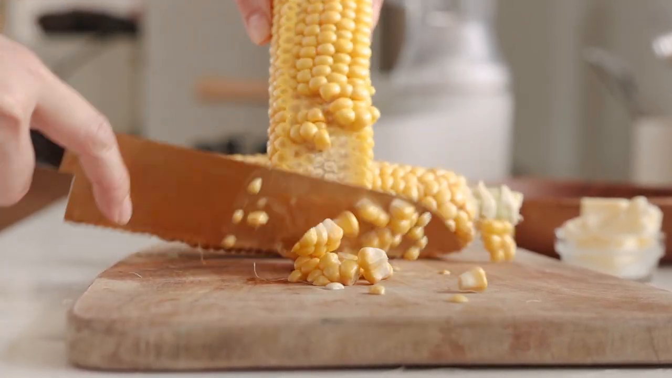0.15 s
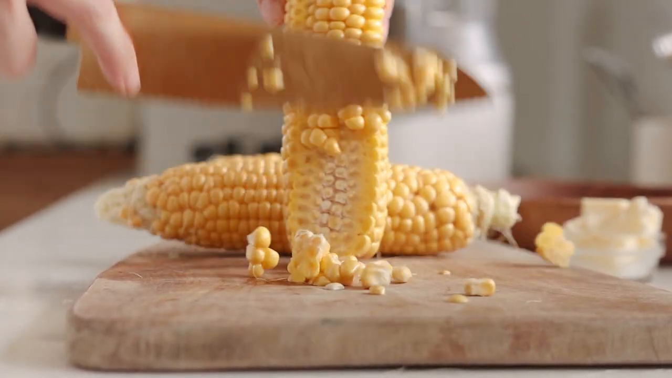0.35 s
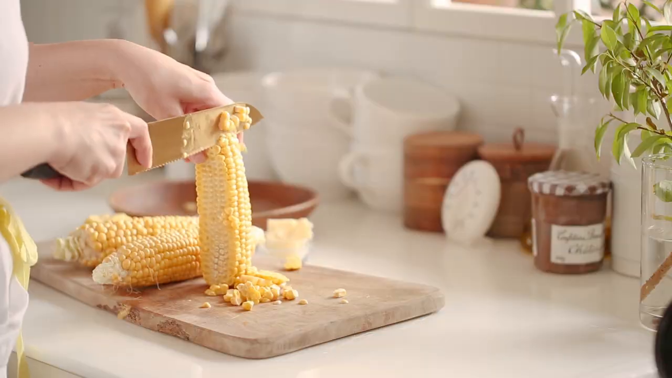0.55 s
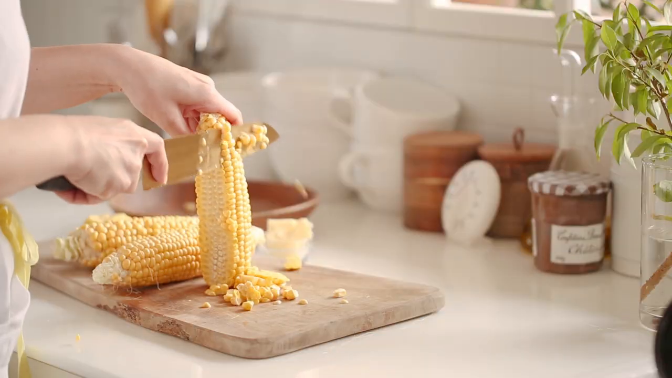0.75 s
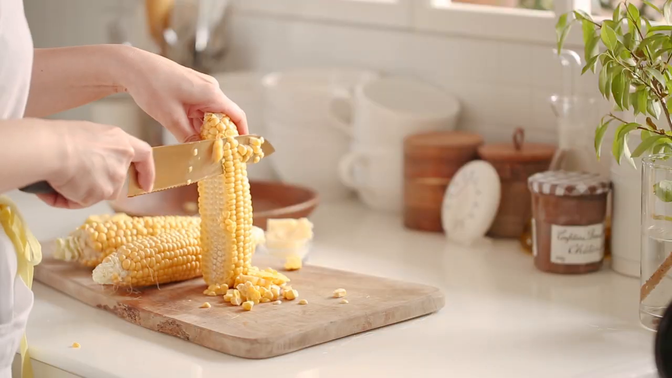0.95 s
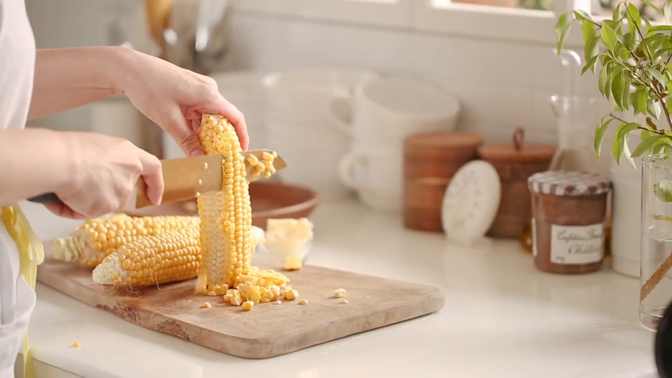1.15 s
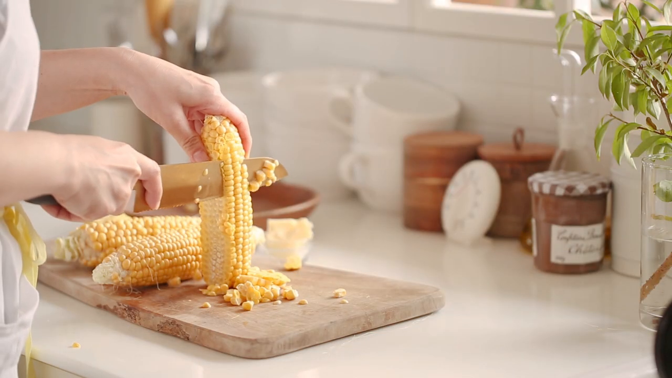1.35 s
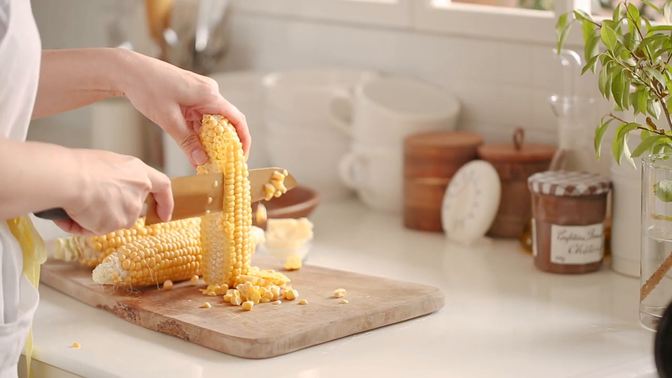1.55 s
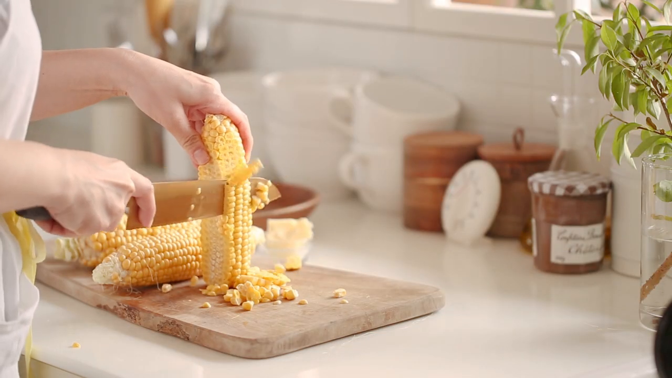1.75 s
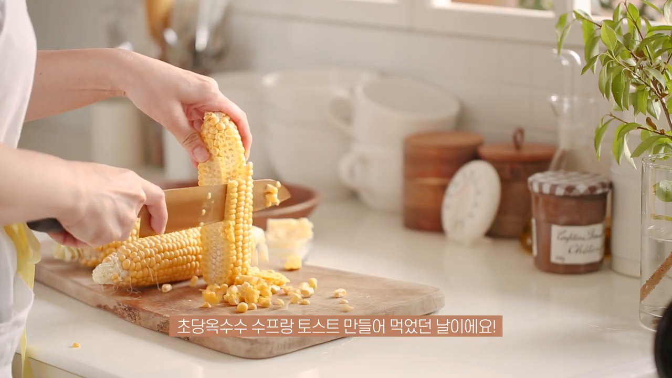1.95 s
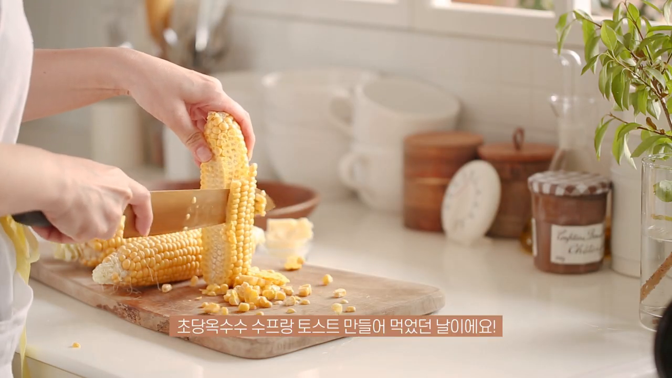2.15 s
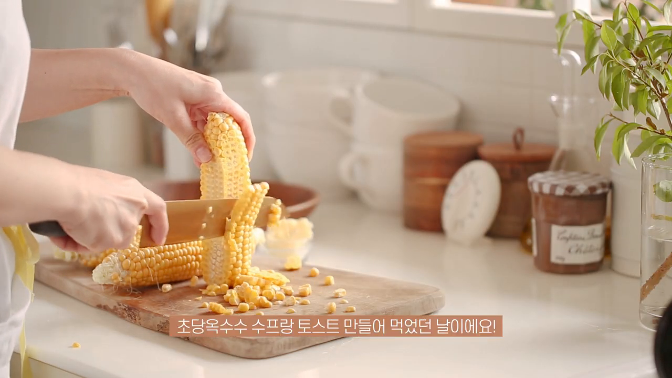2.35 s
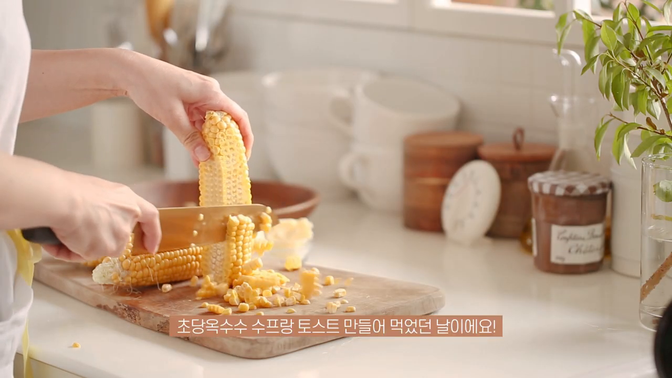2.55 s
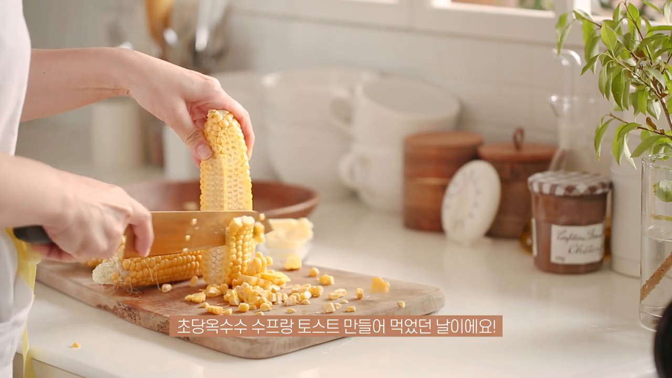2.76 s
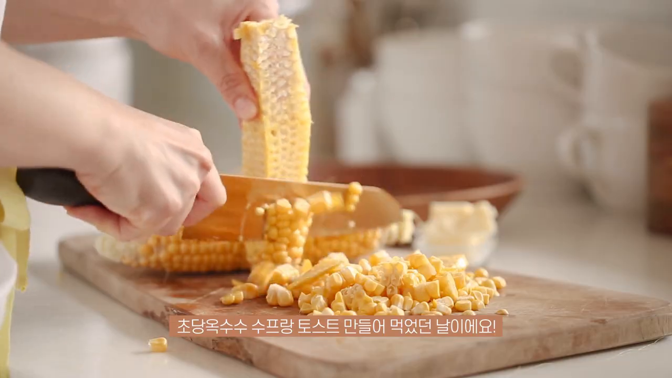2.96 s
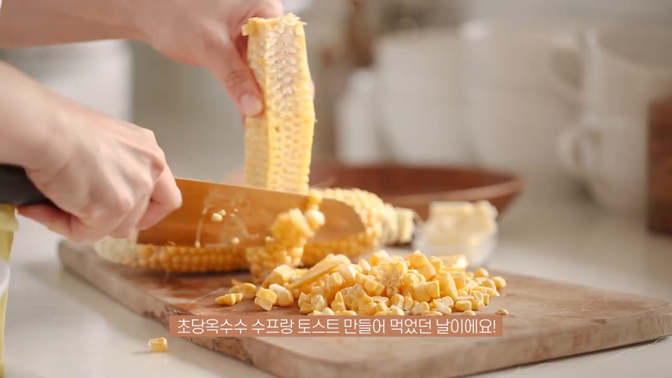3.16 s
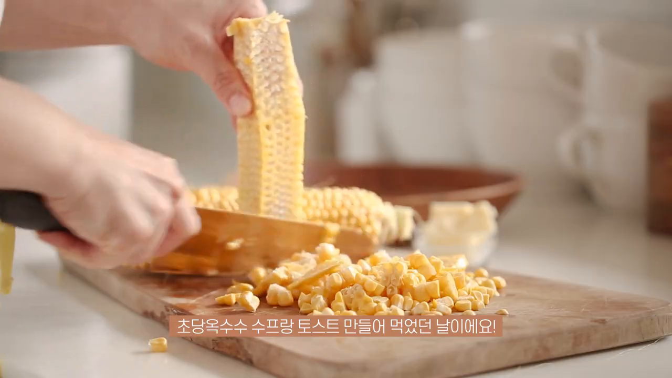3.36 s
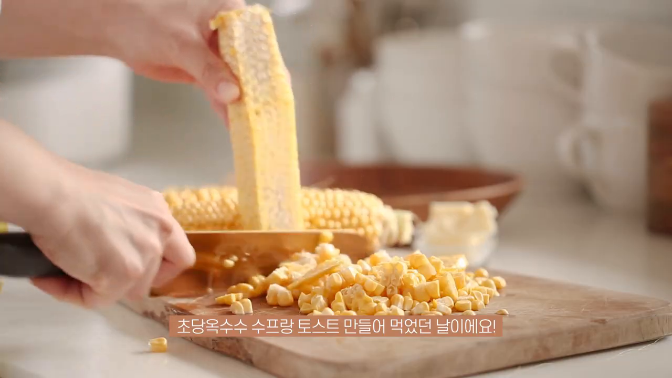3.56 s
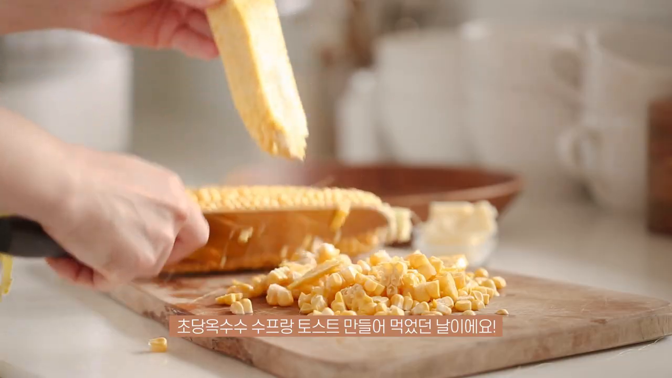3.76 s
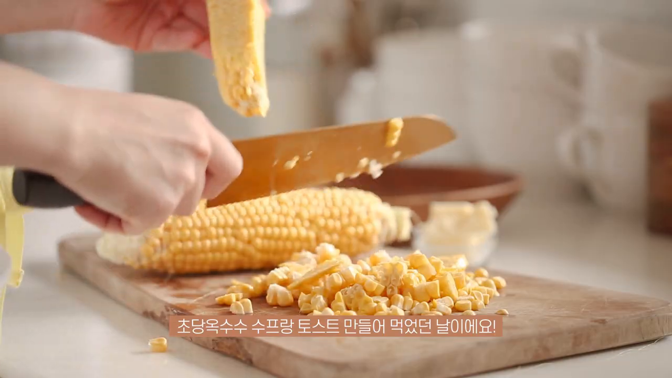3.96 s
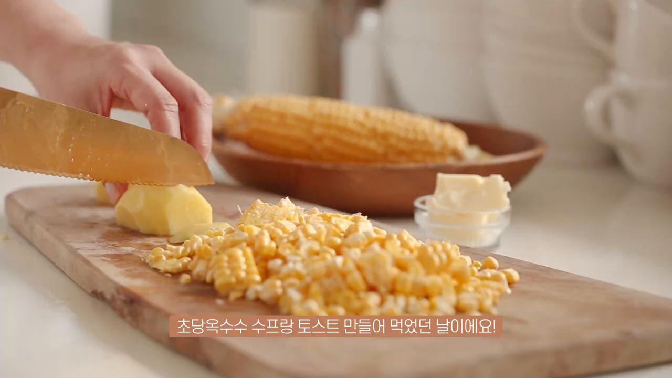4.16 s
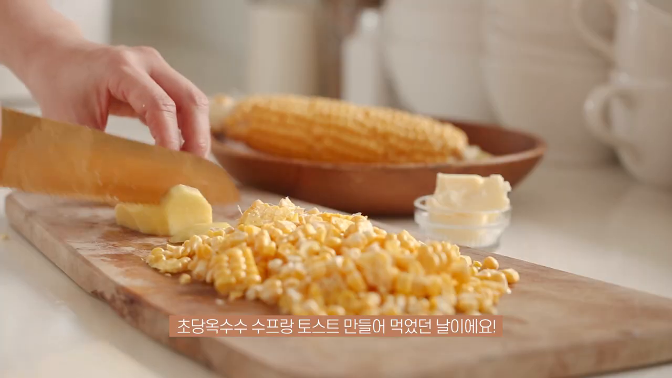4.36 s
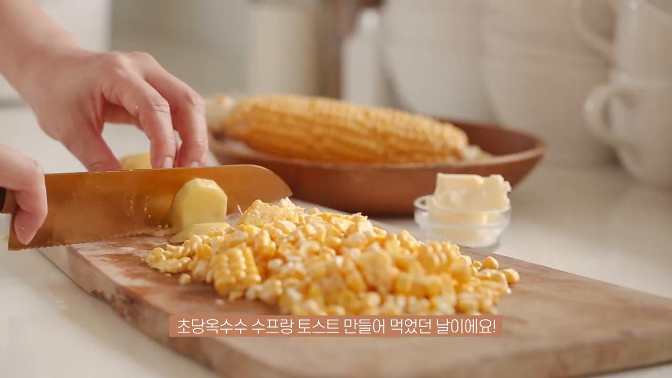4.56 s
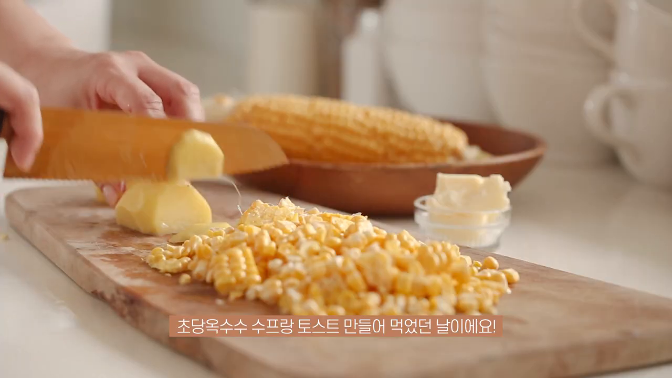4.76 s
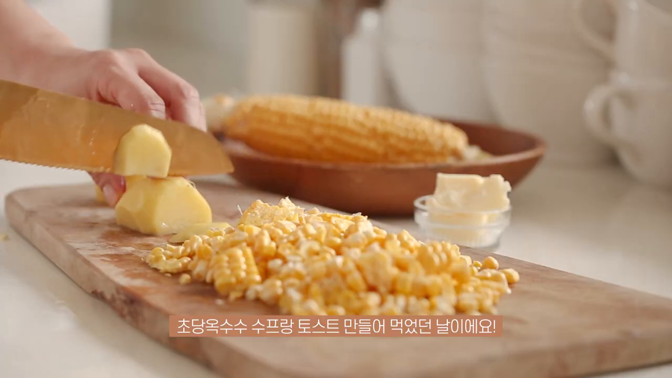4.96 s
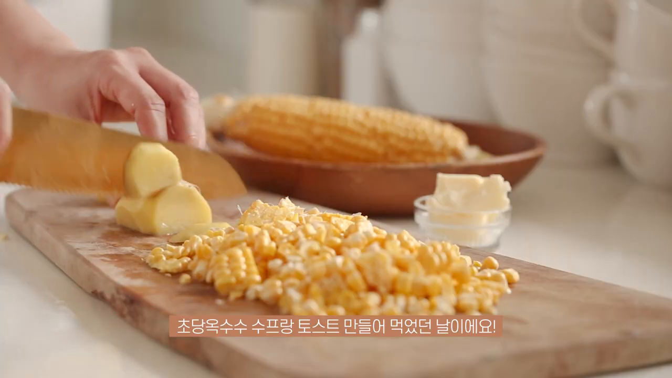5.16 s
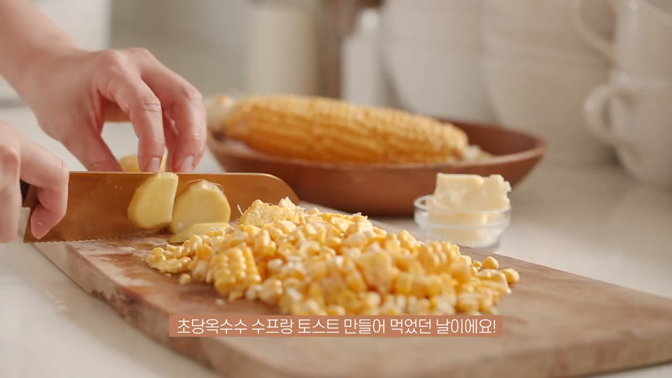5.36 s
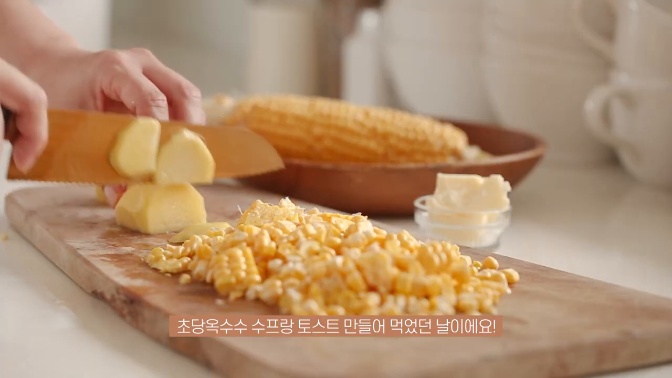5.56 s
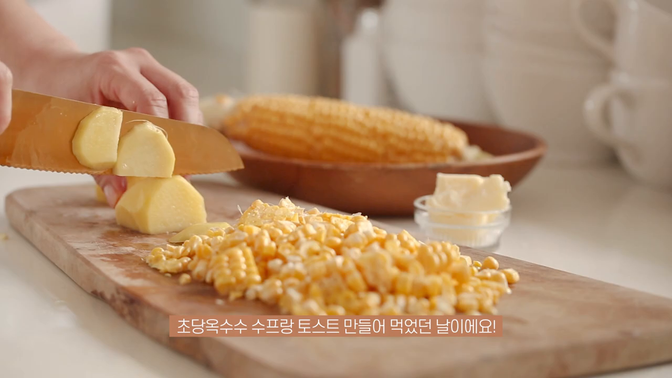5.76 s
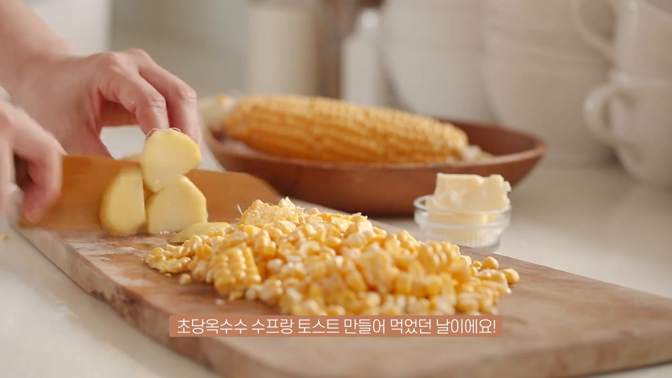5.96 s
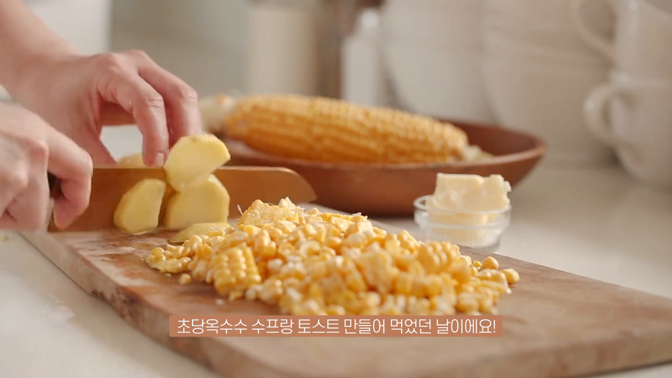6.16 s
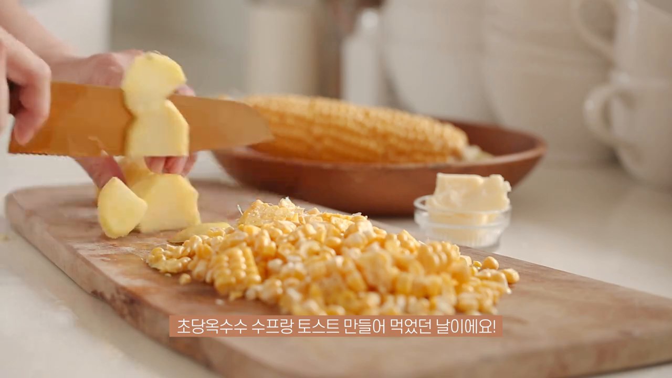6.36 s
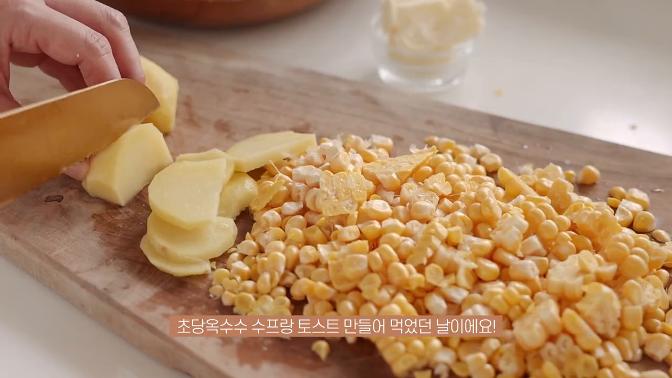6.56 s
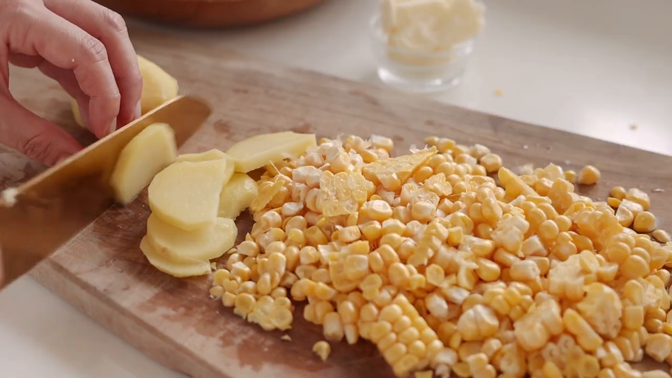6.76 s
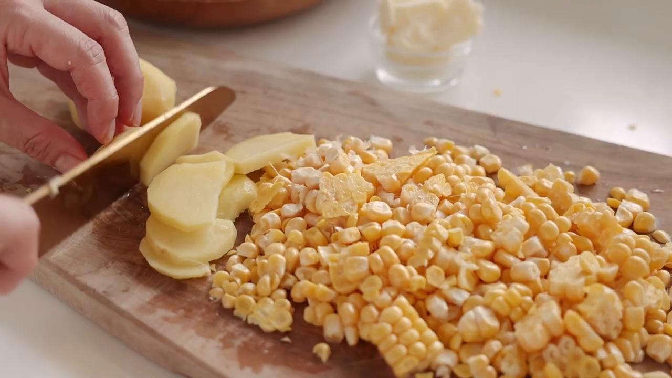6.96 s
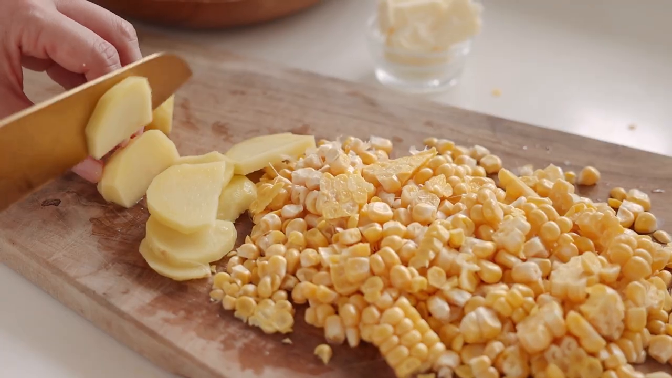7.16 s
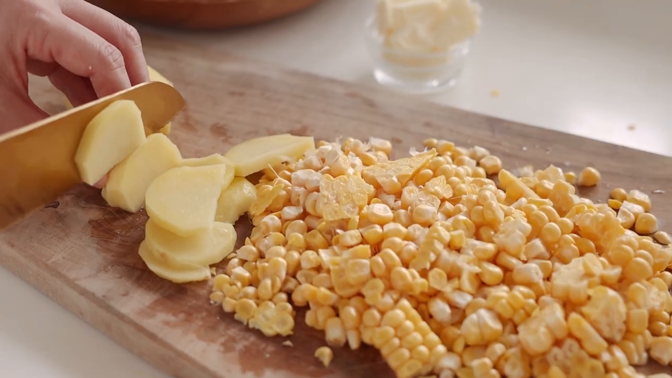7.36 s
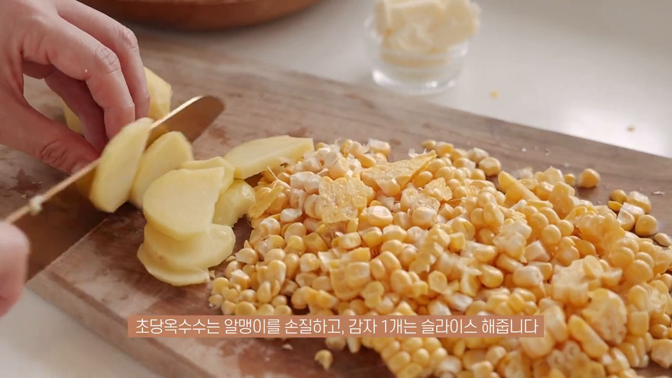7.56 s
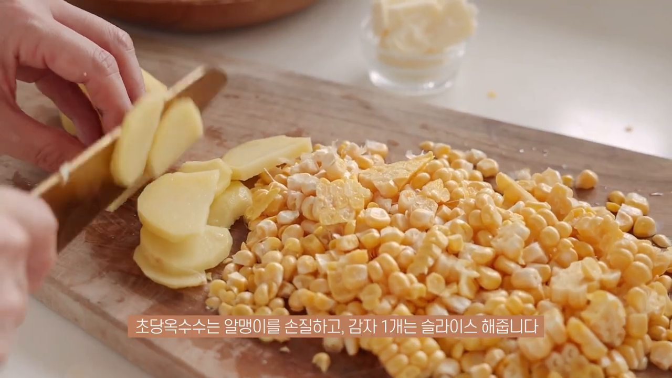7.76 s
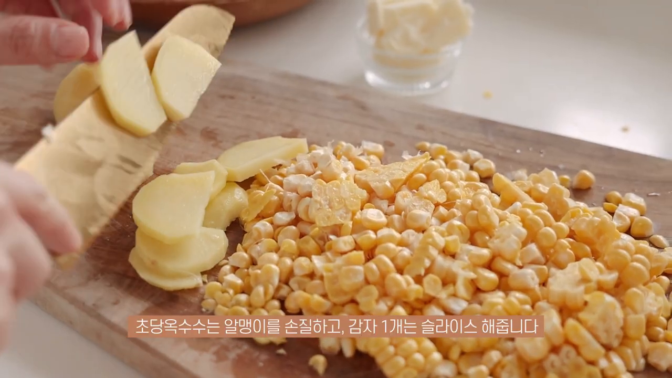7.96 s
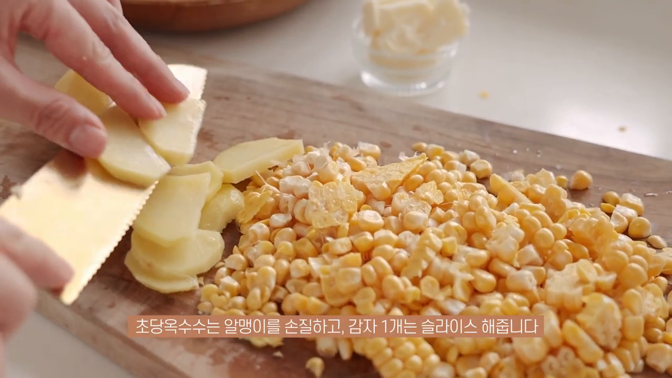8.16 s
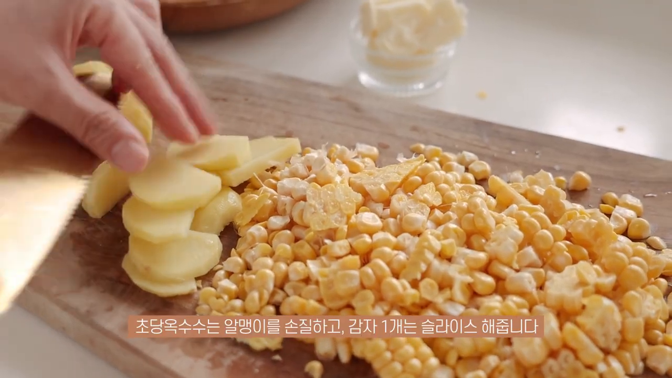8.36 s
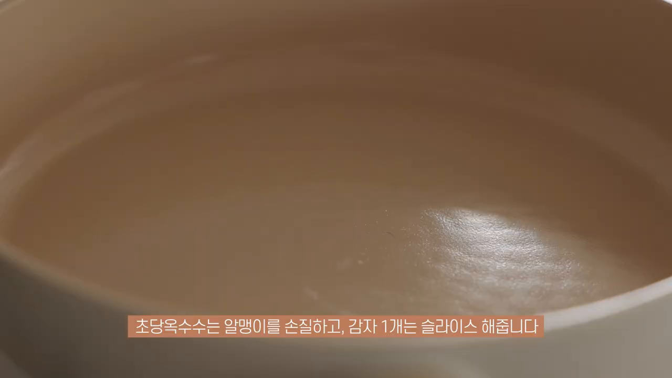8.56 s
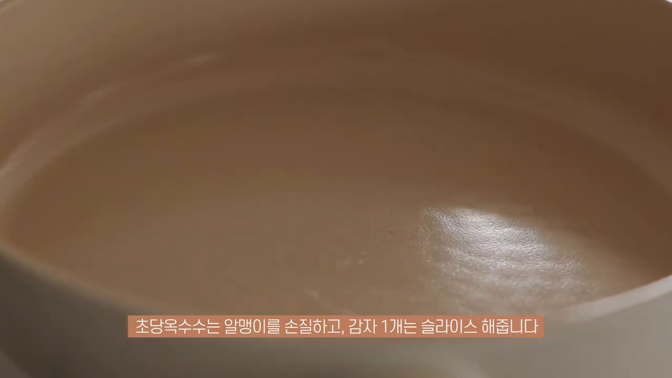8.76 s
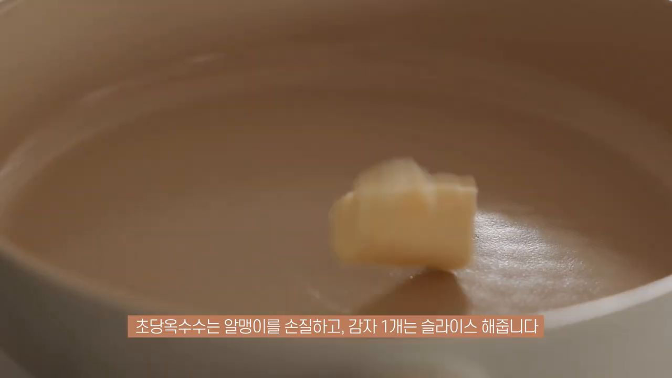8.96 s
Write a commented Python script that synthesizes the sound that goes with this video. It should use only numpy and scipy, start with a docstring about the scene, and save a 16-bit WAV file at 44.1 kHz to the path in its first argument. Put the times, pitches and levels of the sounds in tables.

```python
"""A serrated knife saws the kernels off an upright corn cob, then slices a potato on a wooden board in a kitchen.
Sawing strokes are dense random clicks plus a wavering tooth tone and low noise for the shaken cob.
Bursting skins are ticks of noise with blade modes; loose pieces patter as band-passed board modes.
Each potato slice is a swelling wet hiss of clicks, ending in a knock of the ringing board.
Hard walls ring after it as shaped noise, over quiet room air and a deep rumble."""
import sys
import numpy as np
from scipy import signal
from scipy.fft import rfft, irfft, next_fast_len
from scipy.io import wavfile

SR = 44100
rng = np.random.default_rng(int(sys.argv[2]) if len(sys.argv) > 2 else 0)


def to_wav(sig):
    """Store sig (one row per channel, or 1-D mono) as 16-bit WAV at the path in sys.argv[1].

    Samples outside -1..1 are clipped; the rate is SR.
    """
    pcm = np.clip(np.atleast_2d(sig), -1, 1) * 32767
    pcm = np.round(pcm).astype(np.int16)
    wavfile.write(sys.argv[1], SR, pcm.T)  # frames by channels


N = 396890
TIME = np.arange(N) / SR
CORN_DONE_S = 4.0

# Forward pushes of the saw. Each row: centre in seconds, half length in seconds, crunch in dB, cob judder in dB.
SAW_PUSHES = [(0.018, 0.16, -55.5, -56), (.648, 0.05, -45.5, -50), (0.841, 0.051, -39.5, -39),
              (1.266, .062, -41, -41.5), (1.655, 0.047, -42.5, -40.5), (2.011, 0.042, -44, -49),
              (2.366, 0.049, -41, -44), (2.697, .057, -41.5, -48.5), (3.027, .044, -31, -38),
              (3.358, 0.044, -37.5, -41), (3.653, 0.055, -48, -51.5)]
# Light pulls: drawn back halfway between two pushes while the cycle stays within these limits.
SHORTEST_CYCLE_S, LONGEST_CYCLE_S = 0.22, 0.5
PULL_CYCLE_SHARE = 0.2  # half length over cycle
PULL_CRUNCH_DB, PULL_JUDDER_DB = -52.5, -57  # after a push of mean crunch
PULL_DB_PER_PUSH_DB = 0.28


def sawing():
    """Crunch gain, judder gain and relative blade speed of firm pushes and the light pulls between them."""
    strokes = list(SAW_PUSHES)
    usual_db = np.mean([row[2] for row in SAW_PUSHES])
    for (s, _, db, _), (next_s, *_) in zip(SAW_PUSHES, SAW_PUSHES[1:]):
        cycle_s = next_s - s
        force_db = PULL_DB_PER_PUSH_DB * (db - usual_db)
        if SHORTEST_CYCLE_S < cycle_s < LONGEST_CYCLE_S:
            strokes.append((s + cycle_s / 2, PULL_CYCLE_SHARE * cycle_s,
                            PULL_CRUNCH_DB + force_db, PULL_JUDDER_DB + force_db))
    crunch, judder, speed = np.zeros((3, N))
    for s, half_s, crunch_db, judder_db in strokes:
        stroke = swell(s, half_s)
        crunch += undb(crunch_db) * stroke
        judder += undb(judder_db) * stroke
        speed = np.maximum(speed, stroke)
    return crunch, judder, speed


# Spectrum of the kernel crackle. Each row: frequency in Hz, level in dB.
CORN_SPECTRUM = [(300, -10.5), (600, -8.5), (950, -4.5), (1500, -11), (2200, -8), (3600, -2.5), (5500, -8),
                 (7300, -1.5), (10000, -10), (12800, -5), (16000, -12.5)]
# Spectrum of the cob's shake. Each row: frequency in Hz, level in dB.
JUDDER_SPECTRUM = [(30, -23.5), (60, -2.5), (90, 4.5), (120, -3), (170, 1.5), (230, -5.5), (320, -15),
                   (600, -29), (1500, -59.5)]
# How much the cut shakes the board: strong at first, nearly none at 0.6 s, strong again at the end.
# Each row: time in seconds, level in dB.
BOARD_CONTACT = [(0, 7), (.6, -31), (1.3, -12), (2.8, -9.5), (3.0, -14.5), (3.7, 5.5)]
# The cob's rocking: light at first, stronger mid-way, light again on the last strokes.
# Each row: time in seconds, rocking share in dB.
COB_ROCKING = [(.85, -5), (1.7, 1.5), (3.0, 2.5), (3.4, -6)]


def corn(crunch, judder, speed):
    """Each stroke bursts kernels; the passing teeth catch and shake the cob against the board."""
    tooth_hz = (130 + 26 * speed) * (1 + 0.14 * walk(rate_hz=70))
    tooth = np.sin(2 * np.pi * np.cumsum(tooth_hz) / SR)
    # crunch spurts tooth by tooth
    bite = unit(undb(1.5 * tooth + 2.4 * walk(rate_hz=110)))
    kernels = crackle(CORN_SPECTRUM, rate_hz=7000, scatter_db=2.5, shift_db=5.5, side_db=-9)

    blows = cells(rate_hz=730, scatter_db=1.5)
    wood = unit(signal.fftconvolve(blows, board(detune=0.01, ring=0.81, rebound=0.081))[:N])
    wood = wood * undb(np.interp(TIME, *np.transpose(BOARD_CONTACT)))

    mid, side = (unit(colour(rng.standard_normal(N), JUDDER_SPECTRUM)) for _ in range(2))
    shake = spread(mid, side, side_db=-7.5)
    rocking = undb(np.interp(TIME, *np.transpose(COB_ROCKING)))
    grip = undb(2.5 * walk(rate_hz=30))
    thrum = undb(-3) * unit(tooth * grip) + rocking * shake
    return crunch * (bite * kernels + wood) + judder * thrum


# Loudest skins bursting under the edge. Each row: time in seconds, peak in dB.
SKIN_SNAPS = [(0.594, -32.5), (0.827, -22.5), (1.1134, -34.5), (1.3054, -18.5), (2.0908, -34.5),
              (2.6916, -21), (2.9802, -18.5), (2.9864, -18.5), (3.0026, -17), (3.0235, -16.5),
              (3.0425, -14), (3.1697, -27.5), (3.3169, -23), (7.6136, -16.5)]
# Blade touching the potato between cuts. Each row: time in seconds, peak in dB.
BLADE_TOUCHES = [(4.2371, -51.5), (5.1144, -46.5), (5.5782, -48), (6.5729, -51), (7.3652, -50.5),
                 (8.3924, -47), (8.4868, -35.5)]
# Modes of the steel blade, damped by the food. Each row: frequency in Hz, level in dB, t60 in seconds before the ring factor.
BLADE_MODES = [(2640, 6.5, 0.015), (3940, -10.5, .03), (4300, 0, 0.014), (5720, -4, 0.038),
               (6900, 2, 0.029)]
# Lesser random bursts under the moving blade; peaks relative to the crunch.
BURSTS_PER_S, BURST_DB, BURST_SCATTER_DB = 14, 11.5, 3.5


def snaps(crunch):
    """A taut skin splits: a sharp tick with a little spray, which also tings the blade."""
    out, t = np.zeros((2, N)), np.arange(4096) / SR
    bursts = []
    for s, size in scatter(0, CORN_DONE_S, BURSTS_PER_S):
        crunch_db = 20 * np.log10(crunch[int(s * SR)] + 1e-9)
        bursts.append((s, crunch_db + BURST_DB + BURST_SCATTER_DB * size))
    for s, db in list(SKIN_SNAPS) + list(BLADE_TOUCHES) + bursts:
        decay = np.exp(-t / 0.0014) + undb(-18) * np.exp(-t / 0.005)
        burst = rng.standard_normal((2, len(t))) * decay
        tick = band(burst, [1200, 6000], "bandpass", order=1)
        tick = tick + undb(-5) * band(burst, [6500, 13000], "bandpass")
        ting = unit(ring_modes(BLADE_MODES, detune=0.052, ring=0.42))
        tick = unit(spread(*tick, side_db=-9.5)) + undb(-4) * ting
        add(out, s, undb(db) * tick / np.abs(tick.mean(axis=0)).max())
    return out


# Loudest cut pieces landing on the board. Each row: time in seconds, peak in dB, centre in Hz.
PIECE_DROPS = [(0.021, -20, 1160), (0.04, -18.5, 1190), (0.071, -27.5, 1360), (0.1, -29.5, 1270),
               (0.322, -37.5, 1190), (0.371, -31, 1650), (1.292, -18.5, 1124), (1.433, -24.5, 1590),
               (1.442, -29.5, 990), (1.755, -16.5, 1258), (1.974, -29.5, 1330), (2.113, -20.5, 929),
               (2.259, -31.5, 1110), (2.618, -27, 1630), (3.254, -32, 1560)]
# Showers of crumbs. Each row: start in seconds, end in seconds, mean peak in dB.
CRUMB_SHOWERS = [(0.022, .1, -33), (0.142, .52, -42), (1.418, 1.581, -35), (1.977, 2.38, -36.5),
                 (2.7, 2.76, -30)]
CRUMBS_PER_S, CRUMB_HZ, CRUMB_SCATTER_DB = 26, 1170, 4


def drops():
    """Light pieces stir only the middle modes and bounce twice; crumbs shower around them."""
    out = np.zeros((2, N))
    crumbs = []
    for start, end, db in CRUMB_SHOWERS:
        for s, size in scatter(start, end, CRUMBS_PER_S):
            hz = CRUMB_HZ * np.exp(0.24 * rng.standard_normal())
            crumbs.append((s, db + CRUMB_SCATTER_DB * size, hz))
    for s, db, hz in list(PIECE_DROPS) + crumbs:
        lags_s = np.append(0, rng.uniform(0.006, 0.036, size=2))
        falls_db = np.append(0, rng.uniform(-24, -11, size=2))
        for lag_s, fall_db in zip(lags_s, falls_db):
            wood = board(detune=0.07, ring=0.7, rebound=0.3)
            tap = band(wood, [hz * 0.79, hz * 2], "bandpass", order=2)
            add(out, s + lag_s, undb(db + fall_db) * tap / np.abs(tap).max())
    return out


# Spectrum of the flesh crackle. Each row: frequency in Hz, level in dB.
POTATO_SPECTRUM = [(60, -10), (160, -1), (330, -16), (560, -6.5), (760, -5.5), (1050, -2.5), (1900, -4),
                   (2800, -9), (5500, -10.5), (6600, -6), (7300, -2.5), (10000, -11), (13000, -7.5),
                   (16000, -13)]
SLICE_S, SLICE_DB = 0.22, -36.5  # length; hiss gain reached at a knock of mean level
SLICE_DB_PER_KNOCK_DB = 0.93
TREBLE_ENTER_DB, TREBLE_THROUGH_DB = -2, 0.5  # settings of the treble mix


def slice_ends():
    """Every knock after the corn is done ends one slice of potato: seconds, knock dB."""
    return [(s, db) for s, db, _ in BLADE_KNOCKS if s > CORN_DONE_S]


def potato():
    """The blade gathers speed through the flesh and the hiss brightens; the last skin breaks just above the board."""
    effort, through = np.zeros((2, N))
    usual_db = np.mean([db for _, db in slice_ends()])
    for s, knock_db in slice_ends():
        db = SLICE_DB + SLICE_DB_PER_KNOCK_DB * (knock_db - usual_db)
        depth = np.clip(1 + (TIME - s) / SLICE_S, 0, 1)
        cutting = depth ** 2.34
        sliding = undb(-5.5) * np.exp(-np.abs(TIME - s) / 0.031)
        skin = np.exp(-np.abs(TIME - s + 0.002) / 0.004)
        effort += undb(db) * (np.where(TIME < s, cutting, sliding) + undb(2) * skin)
        through += depth * (TIME < s + SLICE_S)
    flesh = crackle(POTATO_SPECTRUM, rate_hz=14000, scatter_db=2.2, shift_db=1.8, side_db=-6)
    treble = colour(flesh, [(6000, -37), (9000, 10)])
    treble_db = np.interp(through, [0, 1], [TREBLE_ENTER_DB, TREBLE_THROUGH_DB])
    hiss = flesh + (undb(treble_db) - 1) * treble
    return effort * undb(2.4 * walk(rate_hz=420)) * hiss


# Wet rubs on the steel, entering the flesh and as the slice slips off.
# Each row: seconds after the knock, half length in seconds, level in dB, centre in Hz, width in Hz.
WET_RUBS = [(-.115, .04, -67.5, 7400, 910), (0.048, .038, -50.5, 3500, 2600), (0.08, .075, -56, 1850, 700),
            (-.06, 0.032, -50, 7600, 1200)]


def rubs():
    """Short moist swishes of band-passed noise as each slice slips on the steel."""
    out, t = np.zeros((2, N)), np.arange(SR // 2) / SR
    middle_s = t[-1] / 2
    for s, _ in slice_ends():
        for lag_s, half_s, db, hz, width_hz in WET_RUBS:
            noise = rng.laplace(size=(2, len(t)))
            swish = unit(band(noise, [hz - width_hz / 2, hz + width_hz / 2], "bandpass", order=1))
            envelope = np.exp(-((t - middle_s) / half_s) ** 2)
            add(out, s + lag_s - middle_s, undb(db) * envelope * spread(*swish, side_db=-9))
    return out


# Blade meeting the board. Each row: time in seconds, blow level over 10 ms in dB, contact brightness in Hz.
BLADE_KNOCKS = [(3.3873, -19.5, 920), (3.634, -38.5, 1100), (4.5454, -21, 1300), (5.3414, -19.5, 1400),
                (6.0864, -17.5, 1900), (6.8350, -19.5, 1500), (7.618, -18.5, 1900)]
KNOCK_PAN_DB = 2  # left minus right


def knocks():
    """The heavy blade rings the board below a contact cutoff; the worktop and everything on it shudder briefly."""
    out, t = np.zeros((2, N)), np.arange(4096) / SR
    pan_db = np.array([[1], [-1]]) * KNOCK_PAN_DB / 2
    for s, db, hz in BLADE_KNOCKS:
        blow = band(board(detune=0.02, ring=1, rebound=0.7), hz, "lowpass", order=2)
        blow = band(blow, 280, "highpass", order=1)  # a small board radiates little bass
        blow = blow / np.std(blow[:SR // 100])
        shudder = unit(band(rng.standard_normal(len(t)), [450, hz * 0.89], "bandpass", order=2))
        shudder = shudder * (1 - np.exp(-t / 0.002)) * np.exp(-t / 0.016) * undb(-10)
        add(out, s, undb(db + pan_db) * (blow + shudder))
    return out


# Modes of the wooden board. Each row: frequency in Hz, level in dB, t60 in seconds before the ring factor.
BOARD_MODES = [(174, -7, 0.027), (455, -13.5, 0.027), (540, -2, 0.034), (714, -12, 0.018), (953, 6, 0.022),
               (1271, 5.5, 0.011), (1592, -3, 0.016), (1900, -11.5, 0.01), (2697, -16.5, 0.012)]


def board(detune, ring, rebound):
    """One blow rings the board; the flex comes back inverted from the worktop 2 ms later."""
    out = ring_modes(BOARD_MODES, detune, ring)
    lag = int(0.002 * SR)
    return out - rebound * np.pad(out, (lag, 0))[:len(out)]


# Kitchen reverberation. Each row: band centre in Hz, tail level in dB, t60 in seconds.
KITCHEN_BANDS = [(80.3, -2, 0.79), (192, -6, 0.38), (450, -9, .8), (950, -11.5, 0.92), (1474, -14, 1),
                 (2945, -14.5, 0.93), (6800, -15.5, 0.81), (15400, -15, 0.19)]


def kitchen(x):
    """Quick reflections off the worktop and tiles, then a diffuse tail that loses its top treble first."""
    t = np.arange(SR) / SR
    f = np.maximum(np.fft.rfftfreq(SR, 1 / SR), 1)
    centres = np.log([row[0] for row in KITCHEN_BANDS])
    noise, response = rfft(rng.standard_normal((2, SR))), 0
    early = np.exp(-t / 0.016) * (t > 0.004)
    early = undb(-7.5) * early / np.linalg.norm(early)
    for (hz, db, t60), pick in zip(KITCHEN_BANDS, np.eye(len(KITCHEN_BANDS))):
        part = irfft(noise * np.interp(np.log(f), centres, pick), SR)
        tail = undb(-60 * t / t60) * (1 - np.exp(-t / 0.0013))
        envelope = np.hypot(undb(db) * tail / np.linalg.norm(tail), early)
        # long waves reach both ears more alike
        response = response + envelope * spread(*part, side_db=-5 if hz < 3500 else -0.5)
    return signal.fftconvolve(x.mean(axis=0)[None], response, axes=1)[:, :N]


# Spectrum of the room air. Each row: frequency in Hz, level in dB.
AIR_SPECTRUM = [(15, -43.5), (25, -2), (136, -3.5), (173, -3.5), (260, -10.5), (537, -14.5), (722, -19.5),
                (895, -21), (1240, -24), (1900, -31), (15500, -44)]
# Spectrum of the deep rumble. Each row: frequency in Hz, level in dB.
RUMBLE_SPECTRUM = [(15, 1.5), (26, 4), (42, -4.5), (80, -20), (160, -19.5), (400, -49), (1500, -68)]
# Background levels. Each row: time in seconds, air in dB, rumble in dB.
BACKGROUND_LEVELS = [(0, -55, -70), (.55, -54, -50), (.95, -59.5, -62), (2.801, -57.5, -53.5),
                     (3.498, -56, -50), (4.22, -56, -42.5), (4.279, -59, -72), (8.602, -61.5, -79),
                     (8.62, -53.5, -62), (9, -55, -74)]


def air():
    """Low, slightly restless room noise over a deep rumble."""
    s, *levels = np.transpose(BACKGROUND_LEVELS)
    air_db, rumble_db = (np.interp(TIME, s, db) for db in levels)
    hush = unit(colour(rng.standard_normal((2, N)), AIR_SPECTRUM))
    rumble = unit(colour(rng.standard_normal((2, N)), RUMBLE_SPECTRUM))
    hush = undb(air_db + 0.23 * walk(rate_hz=17)) * spread(*hush, side_db=-4)
    return hush + undb(rumble_db) * spread(*rumble, side_db=-2)


def crackle(points, rate_hz, scatter_db, shift_db, side_db):
    """Bursting cells in stereo; each part of the spectrum swells on its own as the blade moves on."""
    mid, side = (unit(colour(cells(rate_hz, scatter_db), points)) for _ in range(2))
    rest, out = spread(mid, side, side_db), 0
    for split_hz in (1500, 3000, 5500, 9500):
        low = signal.sosfiltfilt(signal.butter(4, split_hz, fs=SR, output="sos"), rest)
        out = out + low * undb(shift_db * walk(rate_hz=54))
        rest = rest - low
    return unit(out + rest * undb(shift_db * walk(rate_hz=56)))


def cells(rate_hz, scatter_db):
    """Plant cells bursting: dense clicks, a few much larger than the rest."""
    size = undb(scatter_db * np.minimum(rng.exponential(size=N), 5))
    return unit((rng.random(N) < rate_hz / SR) * size * rng.choice([-1, 1], N))


def ring_modes(modes, detune, ring):
    """Damped sines; each spot that is struck sounds a little different."""
    t, out = np.arange(4096) / SR, 0
    for hz, db, t60 in modes:
        level_change_db, pitch_change = rng.standard_normal(2)
        gain = undb(db + level_change_db - 60 * t / (t60 * ring))
        out = out - gain * np.sin(2 * np.pi * hz * (1 + detune * pitch_change) * t)
    return out


def swell(s, half_s):
    """A smooth rise and fall around time s."""
    return np.exp(-((TIME - s) / half_s) ** 2)


def scatter(start, end, rate_hz):
    """Irregular moments, about rate_hz a second, each with a random value of spread 1."""
    chance = rng.random((200, 2))
    times = start + (np.arange(len(chance)) + chance[:, 0]) / rate_hz
    return [(s, np.sqrt(12) * (u - 0.5)) for s, u in zip(times, chance[:, 1]) if s < end]


def walk(rate_hz):
    """Random values joined by straight lines, with a spread near 1."""
    knots = rng.standard_normal(int(N / SR * rate_hz) + 2)
    return np.interp(TIME * rate_hz, np.arange(len(knots)), knots)


def undb(db):
    """Decibels to gain."""
    return 10 ** (np.asarray(db) / 20)


def unit(x):
    """Scale to rms 1."""
    return x / np.sqrt(np.mean(x ** 2))


def colour(x, points):
    """Filter by an outline of (Hz, dB) points."""
    hz, db = np.transpose(points)
    size = next_fast_len(N, True)
    f = np.maximum(np.fft.rfftfreq(size, 1 / SR), 1)
    gain = undb(np.interp(np.log(f), np.log(hz), db))
    return irfft(rfft(x, size) * gain, size)[..., :N]


def band(x, hz, kind, order=2):
    """Causal low-, high- or band-pass."""
    edges_hz = np.clip(hz, 10, SR / 2 - 100)
    return signal.sosfilt(signal.butter(order, edges_hz, kind, fs=SR, output="sos"), x)


def spread(mid, side, side_db):
    """Left and right from a centre sound and an unrelated side sound."""
    return mid + np.array([[1], [-1]]) * undb(side_db) * side


def add(out, s, x):
    """Mix x into out at time s."""
    i = max(int(s * SR), 0)
    out[..., i:i + x.shape[-1]] += x[..., :N - i]


# The listening point is closer for the corn than for the potato. Each row: time in seconds, room share in dB.
ROOM_SHARE = [(3.8, -4.5), (4.3, -1)]


def scene():
    """Each sound reaches the walls from its own spot, with its own share of reverberation."""
    out, far = air(), undb(np.interp(TIME, *np.transpose(ROOM_SHARE)))
    crunch, judder, speed = sawing()
    sources = [(corn(crunch, judder, speed) + snaps(crunch), 0), (drops(), -1),
               (potato() + rubs(), -1), (knocks(), 0.5)]
    for sound, room_db in sources:
        out = out + sound + undb(room_db) * kitchen(far * sound)
    return out


def record(dry):
    """A steep elliptic low-pass removes the top."""
    return signal.sosfilt(signal.ellip(10, 0.1, 70, 15900, fs=SR, output="sos"), dry)


dry = scene()
out = record(dry)
to_wav(out)
```